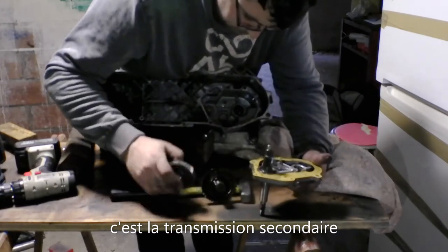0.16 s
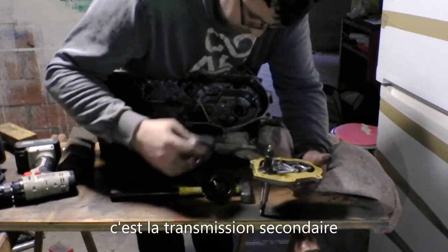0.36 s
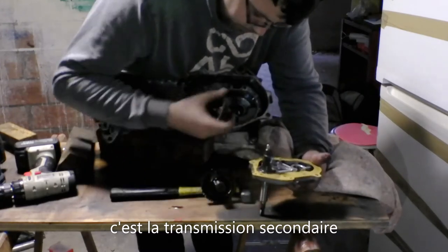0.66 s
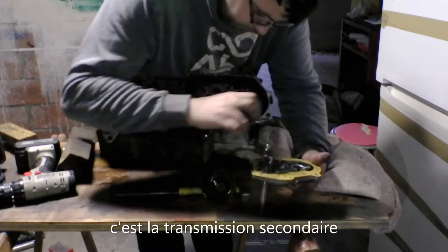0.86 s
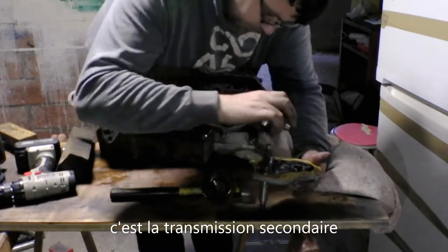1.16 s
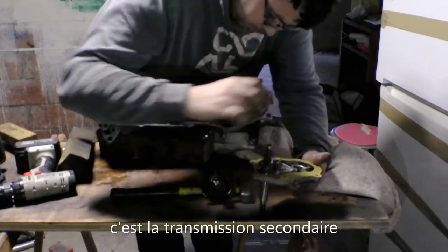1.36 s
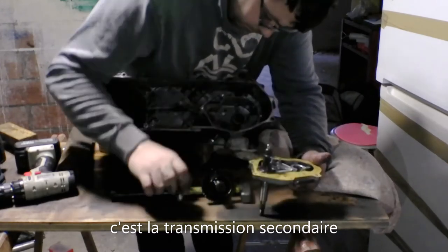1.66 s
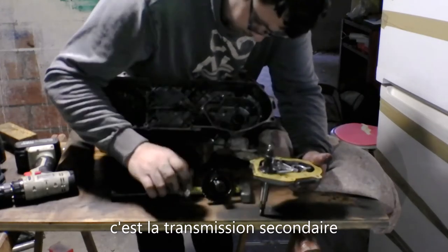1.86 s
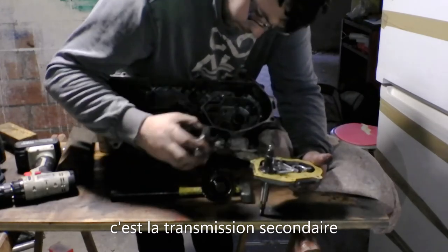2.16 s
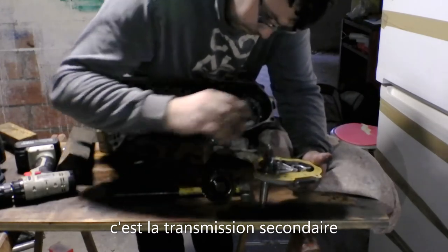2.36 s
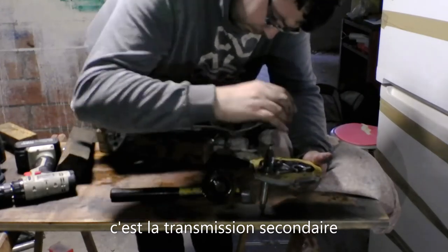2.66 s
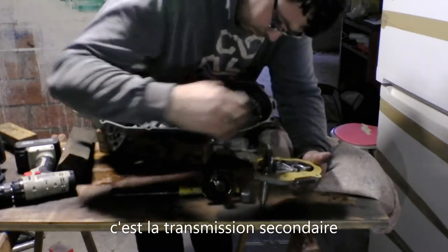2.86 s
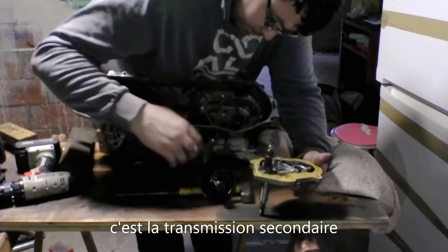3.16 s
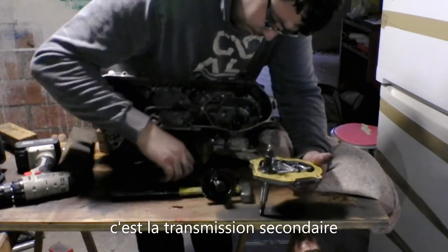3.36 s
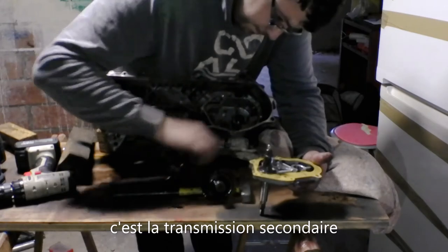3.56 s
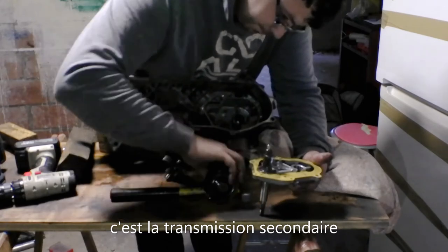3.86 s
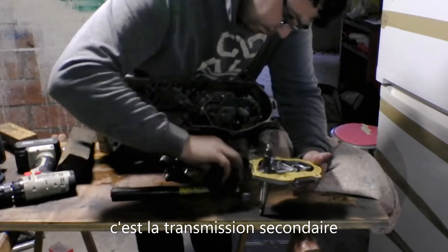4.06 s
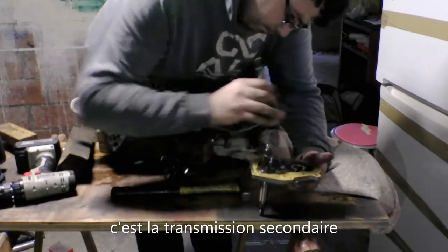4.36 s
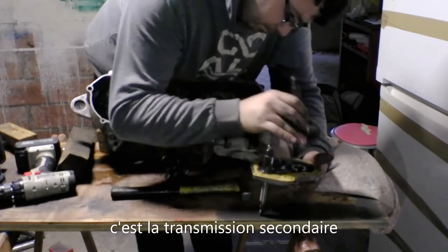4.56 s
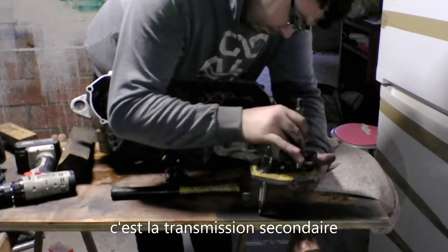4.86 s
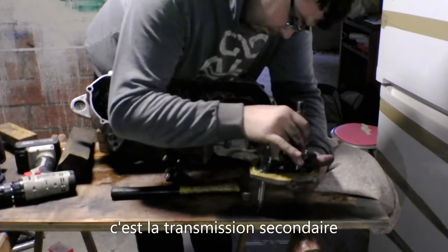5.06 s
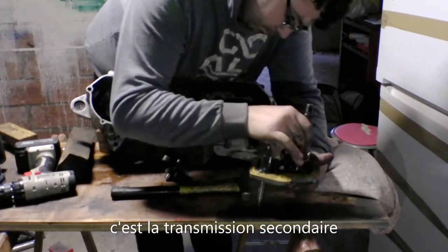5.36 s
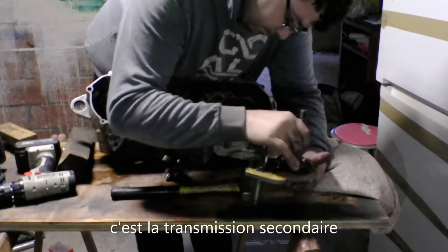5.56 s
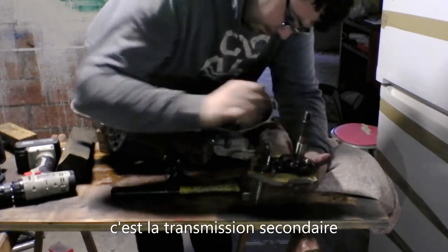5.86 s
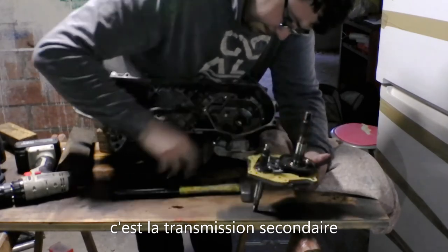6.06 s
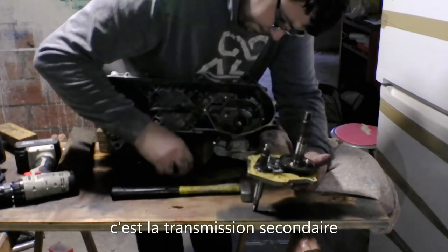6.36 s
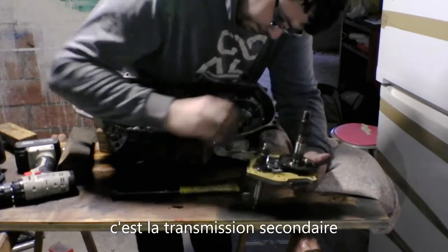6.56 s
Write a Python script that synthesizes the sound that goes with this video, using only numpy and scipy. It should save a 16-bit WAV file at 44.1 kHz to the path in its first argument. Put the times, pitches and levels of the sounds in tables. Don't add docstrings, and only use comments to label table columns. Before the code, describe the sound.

Steady microphone hiss in a small workshop. After a quiet start, a heap of steel gears drops on a wooden bench in one dense, loud clatter. A long pause, then a plank knock and a booming set-down. A very sharp steel crack with a high ring follows, then a shaft clacks, its splines tick, it slides and seats with a firm knock. Faint dragging and a soft washer scrape end it.

```python
import sys
import numpy as np
from scipy import signal
from scipy.fft import rfft, irfft
from scipy.io import wavfile
from scipy.ndimage import uniform_filter1d

SR = 44100
rng = np.random.default_rng(int(sys.argv[2]) if len(sys.argv) > 2 else 0)


def voltage_ratio(level):
    return 10 ** (np.asarray(level, float) / 20)


def master(y):
    cut = np.clip(np.atleast_2d(y).T, -1, 1)
    pcm = np.round(cut * 32767)
    wavfile.write(sys.argv[1], SR, pcm.astype(np.int16))


N = 295911


def seconds(length):
    return np.arange(int(length * SR)) / SR


def octaves(hz):
    return np.log2(np.clip(hz, 150, 9000) / 1000)


def unit(x):
    return x / np.sqrt(np.mean(x ** 2))


def fade(t, t60):
    return np.exp(-np.log(1000) * t / np.maximum(t60, 1e-3))


def add(track, start_s, x):
    i = int(start_s * SR)
    track[i:i + len(x)] += x[:N - i]


def curve(rows, hz):
    f, value = np.transpose(rows)
    return np.interp(np.log(np.maximum(hz, 1)), np.log(f), value)


def colour(x, rows, tilt_db=0.):
    size = 1024
    hz = np.fft.rfftfreq(2 * size, 1 / SR)
    db = curve(rows, hz) + tilt_db * octaves(hz)
    cepstrum = irfft(db * np.log(10) / 20)
    cepstrum[1:size] *= 2
    cepstrum[size + 1:] = 0
    response = irfft(np.exp(rfft(cepstrum)))[:size]
    return signal.fftconvolve(x, response)[:len(x)]


def resonate(x, peaks):
    return sum(voltage_ratio(db) * signal.lfilter(*signal.iirpeak(f, f / max(width, 10), SR), x)
               for f, width, db in peaks)


def blows(cracks, rings, rows, modes, crack, first=4.6):
    t = seconds(.26)
    hz, mode_db, t60 = np.array(modes, float).T[:, :, None]
    for start_s, peak_db, tilt_db, ring_db, crack_t60 in rows:
        grit = rng.standard_normal(len(t)) * fade(t, crack_t60)
        grit[0] = first
        snap = colour(grit, crack, tilt_db)
        gain = voltage_ratio(mode_db + 0.5 * rng.standard_normal(hz.shape) + tilt_db * octaves(hz))
        ring = (gain * np.sin(2 * np.pi * hz * t) * fade(t, t60)).sum(axis=0)
        ring *= 1 - np.exp(-t / 0.00081)
        add(cracks, start_s, voltage_ratio(peak_db) * snap / abs(snap).max())
        add(rings, start_s, voltage_ratio(peak_db + ring_db) * ring / gain.max())


# f/Hz, level/dB, t60/s
HEAP_MODES = [(210, -6, 0.058), (400, -11, 0.04), (445, 0, 0.049), (543, 1, 0.066), (820.5, -2.5, 0.06),
              (941, -9, 0.084), (1065, -1.5, 0.078), (1296, -9.5, 0.095), (1575, -17, 0.043),
              (1975, -13, .04), (2810, -17, 0.056), (3004, -14, 0.023)]
COG_MODES = [(2160, -5.5, .07), (2600, 1, 0.12), (2820, -1, 0.064), (5314, -0.5, 0.071), (5700, -2, 0.077),
             (6845, -4.5, 0.073), (7294, -1.5, 0.076), (8700, -18, .06)]
# f/Hz, level/dB
HEAP_COLOUR = [(47, -19), (90, -3.5), (200, -12.5), (500, -5), (1050, -5), (1900, -13), (2900, -21),
               (6100, -22.5), (8200, -39), (12000, -46.5), (22000, -120)]
# t/s, peak/dB, brightness/(dB per octave), ring/dB, crack t60/s
HEAP_HITS = [(1.386, -22.5, -10, -6.5, 0.037), (1.39, -19, -8.5, -3.5, 0.06),
             (1.396, -19.5, -5.5, -8.5, .04), (1.399, -16.5, 1.5, -11, 0.22),
             (1.4042, -24, -1.5, -8, 0.039), (1.4159, -5.5, -1.5, 1.5, 0.032), (1.422, -8.5, 2, -8, 0.021),
             (1.426, -2, 1, -11.5, 0.0087), (1.4303, -3, 4, -8, 0.05), (1.434, -4.5, 1.5, -19, 0.018),
             (1.437, -11.5, -3, -7.5, 0.014), (1.444, -18, 1, 0, 0.062), (1.451, -14, 0.5, -7, 0.15),
             (1.457, -15.5, -2, -7.5, 0.062), (1.466, -19.5, -1.5, -9, 0.053), (1.477, -31, 4, -7, 0.035),
             (1.488, -33.5, -3.5, -8, 0.053), (1.505, -46, 0, -14, 0.043), (1.539, -28, 2.5, -14, 0.093),
             (1.516, -41, 8, -10, 0.018), (1.547, -37, -4, -10, .02), (1.558, -38, -2, -18, 0.03),
             (1.575, -42, 0, -13, 0.035), (1.597, -46, -4, -17, 0.033)]
COG_HITS = [
    (1.388, -26.5, 7, -9.5, .03),
    (1.4328, -17, -3, -3.5, .015),
    (1.476, -35, 6, -13, .03),
    (1.534, -35, -10, -2, .04),
]


def heap_drop(cracks, rings):
    blows(cracks, rings, HEAP_HITS, HEAP_MODES, HEAP_COLOUR)
    blows(cracks, rings, COG_HITS, COG_MODES, HEAP_COLOUR)


# f/Hz, level/dB, t60/s
PLANK_MODES = [(191, 3.5, 0.084), (229.6, 1, .07), (321, -6, 0.2), (470, -2, 0.089), (563, -5, 0.061),
               (699, -21.5, 0.13), (1030, -15, 0.1), (1154, -6, 0.034), (1330, -34, .07),
               (1800, -23, 0.093), (2550, -19, .06), (4231, -18, 0.023)]
# f/Hz, level/dB
KNOCK_COLOUR = [(47, -14), (80, -9.5), (544, -10), (1490, -22), (1780, -14.5), (2040, -32), (2700, -23),
                (3300, -42.5), (4400, -34.5), (9000, -77), (11700, -95), (19800, -120)]
# t/s, peak/dB, brightness/(dB per octave), ring/dB, crack t60/s
KNOCK_HITS = [
    (3.328, -19, 0.049, -2, 0.083),
    (3.3321, -24, -0.25, 1.4, 0.0066),
    (3.36, -36, 0, 1.8, .02),
]


def plank_knock(cracks, rings):
    blows(cracks, rings, KNOCK_HITS, PLANK_MODES, KNOCK_COLOUR)


# f/Hz, level/dB, t60/s
BENCH_MODES = [(186, -7.5, 0.12), (239.5, -6, 0.059), (417, -35, .07), (476.7, 3.5, 0.11), (514, -9, 0.17),
               (633, -11, 0.1), (717, -14.5, 0.094), (1040, -8.5, 0.12), (1470, -1.5, 0.033),
               (1836, -24, .07), (2690, -10, 0.028)]
# f/Hz, level/dB
BENCH_COLOUR = [(47, -24.5), (80, -11), (517, -12.5), (873, -16.5), (2150, -17.5), (2710, -11.5),
                (3010, -16), (6270, -28), (7890, -40), (9530, -64), (12000, -48), (15600, -83),
                (22000, -120)]
# t/s, peak/dB, brightness/(dB per octave), ring/dB, crack t60/s
BENCH_HITS = [
    (3.4955, -10, -1.3, -5.5, 0.058),
    (3.4999, -11.5, 0.4, -9, 0.029),
    (3.514, -19.5, -3.5, 6, 0.034),
    (3.523, -29, -2.5, 6.5, .02),
    (3.953, -41, -9.5, -21, 0.029),
]


def bench_set_down(cracks, rings):
    blows(cracks, rings, BENCH_HITS, BENCH_MODES, BENCH_COLOUR)


# f/Hz, level/dB, t60/s
GEAR_MODES = [(2993, -.5, .18), (3004, -33, .5), (4226, -32, .08), (6029, -14, .1), (6380, -33, .1),
              (6691, -8.5, .12), (7359, -15, .16), (11500, -30, .12)]
# f/Hz, level/dB
GEAR_COLOUR = [(47, -62), (80, -26), (1780, -1), (2390, -2.5), (4120, 1.5), (5410, -11.5), (6960, -14.5),
               (7890, -12.5), (8760, -36.5), (12000, -27), (15600, -83), (22000, -120)]
# t/s, peak/dB, brightness/(dB per octave), ring/dB, crack t60/s
GEAR_HITS = [
    (4.013, -0.28, 0.28, -11, 0.0068),
]


def gear_crack(cracks, rings):
    blows(cracks, rings, GEAR_HITS, GEAR_MODES, GEAR_COLOUR, first=11.4)


# f/Hz, level/dB, t60/s
CLATTER_MODES = [(225.5, -8.5, 0.067), (475, -6.5, 0.11), (800, -21, 0.056), (1070, 1, 0.029),
                 (1550, -13, 0.028)]
# f/Hz, level/dB
CLATTER_COLOUR = [(60, -46), (150, -7.5), (450, 3.5), (1100, 7.5), (2200, -1), (4200, -20), (5500, -30),
                  (8000, -42), (12000, -45)]
# t/s, peak/dB, brightness/(dB per octave), ring/dB, crack t60/s
CLATTER_HITS = [
    (4.0157, -16, -0.5, -14, 0.12),
    (4.038, -20, -5, -6, 0.054),
    (4.046, -35, 3, -9, 0.02),
    (4.055, -23.5, -2, 1.5, 0.018),
    (4.063, -26, -5, -14, 0.016),
    (4.081, -49, 1, 14, 0.025),
]


def gear_clatter(cracks, rings):
    blows(cracks, rings, CLATTER_HITS, CLATTER_MODES, CLATTER_COLOUR)


# f/Hz, level/dB, t60/s
SHAFT_MODES = [(440, -5, .04), (700, -6, 0.075), (1102, 1, 0.055), (1190, 2, 0.04), (1570, -10, 0.031),
               (1824, -6, 0.043), (2139, -10, 0.06), (3100, -18.5, .09), (3341, -11, .05), (3612, 1, 0.075),
               (3670, -26.5, 0.46), (3800, -6.5, 0.07), (4180, -22.5, .12), (5860, -22.5, 0.09)]
# f/Hz, level/dB
SHAFT_COLOUR = [(47, -64.5), (120, -22), (280, -30), (873, -7.5), (1120, 1), (2650, -15.5), (3710, -3.5),
                (4970, -29), (7570, -26.5), (9140, -62.5), (12000, -51), (15600, -88), (22000, -120)]
# t/s, peak/dB, brightness/(dB per octave), ring/dB, crack t60/s
SHAFT_HITS = [
    (4.7164, -4.5, 0.98, -6.5, 0.045),
    (4.7215, -19, 0.21, -4.5, .015),
    (4.728, -16, 0.5, -14.5, 0.014),
    (4.734, -28, 1, -10, 0.026),
]


def shaft_landing(cracks, rings):
    blows(cracks, rings, SHAFT_HITS, SHAFT_MODES, SHAFT_COLOUR)


# f/Hz, level/dB, t60/s
SPLINE_MODES = [(1176, -0.5, 0.032), (1943, -20, 0.096), (2110, -10, 0.091), (2504, 1.5, 0.059),
                (2910, -3.5, 0.065), (3660, 4.5, 0.033), (3780, -13, 0.057), (4050, -6, 0.097),
                (4090, -6, .09), (6130, -23, 0.074), (6500, -18, 0.035), (4920, -24, .08)]
# f/Hz, level/dB
SPLINE_COLOUR = [(47, -79), (80, -71), (1150, -14.5), (1670, -18), (2060, -8.5), (3340, -15.5),
                 (3630, -10.5), (5190, -28), (7890, -28.5), (10600, -54.5), (12000, -33), (15600, -54.5),
                 (22000, -120)]
# t/s, peak/dB, brightness/(dB per octave), ring/dB, crack t60/s
SPLINE_HITS = [
    (4.8448, -18.5, -5, -9, 0.051),
    (4.855, -25, -10.5, -14, .015),
    (4.874, -27, -4, -9, 0.007),
    (4.8856, -8.5, 0.5, -12, 0.005),
    (4.889, -20, 0.5, 4, 0.03),
    (4.893, -14, 0, -13, 0.024),
    (4.902, -25.5, -4.5, -11, 0.03),
    (4.911, -35, 1.5, -10, .1),
]


def spline_catch(cracks, rings):
    blows(cracks, rings, SPLINE_HITS, SPLINE_MODES, SPLINE_COLOUR)


# f/Hz, level/dB, t60/s
SEAT_MODES = [(352, -15.5, 0.14), (1204, 12.5, 0.033), (2034, -2.5, 0.038), (2074, -5.5, 0.063),
              (2420, -11, 0.028), (2772, -20, 0.064), (3520, -5, 0.043), (3690, -4, 0.025),
              (3800, -3, 0.031), (4140, -5, 0.037), (4580, -4.5, 0.022), (6140, -27, 0.035),
              (6700, -10, 0.0205)]
# f/Hz, level/dB
SEAT_COLOUR = [(47, -68), (80, -17.5), (560, -25), (860, -16.5), (1200, -4.5), (1710, -19.5), (2020, -13.5),
               (3070, -24.5), (3710, -18.5), (5080, -36.5), (6530, -29.5), (8300, -45.5), (12000, -50),
               (15600, -89), (22000, -120)]
# t/s, peak/dB, brightness/(dB per octave), ring/dB, crack t60/s
SEAT_HITS = [
    (5.359, -26, -1.6, 1, 0.022),
    (5.370, -31.5, -.3, -9, .012),
    (5.479, -5.5, 1.06, 0.5, 0.031),
    (5.488, -17, -1.8, -25.5, 0.035),
    (5.497, -25, 2, -18, 0.052),
    (5.51, -32, 1.5, -17, 0.061),
    (5.522, -34, 0.56, -18, 0.052),
    (5.554, -42, -1, -1, 0.027),
]


def shaft_seat(cracks, rings):
    blows(cracks, rings, SEAT_HITS, SEAT_MODES, SEAT_COLOUR)


# f/Hz, width/Hz, level/dB
STEEL_BANDS = [(1150, 490, -3.5), (1760, 540, -5.5), (2650, 510, -1)]
GRIT_BANDS = [(3460, 1200, 0), (4370, 1000, -5), (5850, 1300, -2.5), (7830, 10000, 2)]
# t/s, peak level/dB, f/Hz, t60/s
TOUCH_NOTES = [(1.391, -15, 262, 0.027), (1.43, -11, 2976, 0.03), (1.452, -10, 1070, 0.047),
               (1.476, -23.5, 1880, 0.044), (3.547, -36, 1820, 0.034), (4.036, -21.5, 1070, 0.017),
               (4.046, -22, 506, 0.02), (4.054, -16.5, 1133, 0.036), (4.063, -20, 506, 0.024),
               (3.664, -50, 1220, 0.029), (3.692, -45.5, 1190, 0.043), (3.701, -48, 2310, 0.051),
               (4.045, -24.5, 6691, 0.17), (5.098, -49.5, 2490, 0.091), (3.928, -55, 6630, .12),
               (3.954, -51, 6720, .2), (3.954, -58, 6200, .25), (4.7174, -30, 7410, .17),
               (4.855, -27, 2130, 0.032), (1.476, -30, 10200, .08), (5.48, -18.5, 1250, .03),
               (5.126, -41.5, 2580, 0.029), (5.277, -41, 2280, 0.0099), (5.314, -43, 1030, 0.043),
               (5.343, -33, 2640, 0.055), (5.345, -36, 3650, 0.075), (5.411, -44, 1150, 0.033),
               (5.429, -36, 2750, 0.035), (6.089, -43.5, 2700, 0.041), (6.089, -39.5, 3650, 0.021),
               (6.193, -49, 4400, 0.065), (6.286, -52, 3580, 0.018)]


def touches(track):
    t = seconds(.12)
    for start_s, peak_db, hz, t60 in TOUCH_NOTES:
        grit = unit(resonate(rng.standard_normal(len(t)), STEEL_BANDS + GRIT_BANDS)) * fade(t, 0.78 * t60)
        note = np.sin(2 * np.pi * hz * t) * fade(t, t60)
        add(track, start_s, voltage_ratio(peak_db - 2) * (note + 0.11 * grit))


def slips(rate_hz, spread_db):
    clicks = rng.random(N) < rate_hz / SR
    return clicks * rng.standard_normal(N) * voltage_ratio(spread_db * rng.exponential(size=N))


def swells(rows):
    t, gain = np.arange(N) / SR, np.zeros(N)
    for peak_s, rise, fall, db in rows:
        span = slice(int((peak_s - rise) * SR), int((peak_s + fall) * SR))
        late = t[span] - peak_s
        drop_db = 30 * np.where(late < 0, -late / rise, late / fall)
        gain[span] += voltage_ratio(db - drop_db)
    return uniform_filter1d(gain, size=200)


# f/Hz, width/Hz, level/dB
WOOD_BANDS = [(199, 41, 4), (328, 100, -6), (452.8, 160, -2), (802, 130, -11)]
# t/s of the hardest push, rise/s, fall/s, steel level/dB, wood over steel/dB
DRAG_PUSHES = [(1.375, .12, 0.084, -39, -4.5), (1.392, 0.01, 0.047, -36, 6),
               (1.489, 0.076, 0.14, -35.5, -14), (1.555, .12, 0.17, -49, 5.5),
               (3.672, 0.022, 0.016, -51, -5), (3.692, 0.037, 0.18, -64, 7),
               (3.959, 0.092, 0.067, -55.5, 5), (5.122, 0.086, .025, -56, -20),
               (5.276, 0.0033, 0.017, -52, -15), (5.29, 0.049, 0.11, -53, -4),
               (5.345, 0.0054, 0.043, -42.5, -4), (5.371, 0.014, 0.07, -55.5, 14),
               (5.40, 0.045, 0.23, -61, -4), (5.469, 0.062, 0.11, -43, -22.5),
               (5.862, 0.081, 0.19, -63.5, 3), (5.94, 0.25, 0.14, -58, -9.5),
               (6.09, 0.016, 0.13, -54.5, -1), (6.188, 0.21, 0.5, -55.5, -2), (6.27, 0.066, 0.025, -70, 7)]


def dragging():
    rasp = slips(6000, 1.2)
    wood = unit(resonate(slips(2600, 0.83), WOOD_BANDS))
    steel = unit(resonate(rasp, STEEL_BANDS))
    grit = unit(resonate(resonate(rasp, GRIT_BANDS), GRIT_BANDS))
    wood_rows = [(s, rise, fall, db + wood_db) for s, rise, fall, db, wood_db in DRAG_PUSHES]
    steel_rows = [(s, rise, fall, db) for s, rise, fall, db, _ in DRAG_PUSHES]
    grit_rows = [(s, rise, 0.5 * fall, db - 4.5 + .15 * wood_db) for s, rise, fall, db, wood_db in DRAG_PUSHES]
    return wood * swells(wood_rows) + steel * swells(steel_rows) + grit * swells(grit_rows)


# f/Hz, width/Hz, level/dB
BORE_BANDS = [(1260, 60, -3), (1880, 67, -3.5), (2280, 60, 0), (2750, 53, -7), (3650, 62, 2),
              (4400, 79.7, 1), (6000, 100, -2), (7550, 66, -2.5)]
# t/s, rise/s, fall/s, level/dB
BORE_SLIDES = [
    (5.277, 0.0038, 0.033, -49.5),
    (5.43, 0.042, 0.044, -45),
    (5.465, 0.05, 0.02, -45),
]


def bore_slide():
    return unit(resonate(slips(3000, 1.3), BORE_BANDS)) * swells(BORE_SLIDES)


# t/s, rise/s, fall/s, level/dB
BENCH_HUMS = [
    (6.198, 0.26, 0.065, -49.5),
    (6.242, 0.044, 0.079, -51.5),
]


def bench_hum():
    lowest = WOOD_BANDS[:1]
    return unit(resonate(resonate(slips(350, 2.0), lowest), lowest)) * swells(BENCH_HUMS)


# f/Hz, width/Hz, level/dB
WASHER_BANDS = [(1660, 360, -5), (2180, 260, -3), (2640, 100, -6), (2950, 145, -4.5)]
# t/s, rise/s, fall/s, level/dB
WASHER_SCRAPES = [
    (6.292, 0.014, 0.11, -51.5),
    (6.326, 0.11, 0.29, -50.5),
]


def washer_scrape():
    squeal = unit(resonate(resonate(slips(2200, 1.44), WASHER_BANDS), WASHER_BANDS))
    return squeal * swells(WASHER_SCRAPES)


# f/Hz, t60/s
ROOM_DECAY = [(100, 0.45), (400, 0.27), (1500, 0.17), (4000, 0.19), (9000, 0.24)]


def room(x):
    t = seconds(.4)
    tail = 0
    for hz in 125 * 2. ** np.arange(7):
        band = resonate(rng.standard_normal(len(t)), [(hz, 0.87 * hz, 0)])
        tail = tail + band * fade(t, curve(ROOM_DECAY, hz))
    tail *= np.clip(t / 0.003, 0, 1)
    return voltage_ratio(-14) * signal.fftconvolve(x, tail / np.sqrt(np.sum(tail ** 2)))[:N]


def shake(x):
    t = seconds(.8)
    sway = resonate(rng.standard_normal(len(t)), [(55, 40, 0)]) * fade(t, .6)
    return voltage_ratio(-64) * signal.fftconvolve(abs(x), sway / np.sqrt(np.sum(sway ** 2)))[:N]


def microphone(x):
    x = signal.sosfilt(signal.butter(4, 162, "high", fs=SR, output="sos"), x)
    return signal.sosfilt(signal.butter(3, 8970, fs=SR, output="sos"), x)


# f/Hz, level/dB
HISS_COLOUR = [(12, -61), (20, -29.5), (59, -17), (97, -3.5), (123, -8), (181, -1), (320, -0.5),
               (468, -3.5), (850, -5), (1820, -9.5), (2450, -11.5), (12200, -16.5), (13200, -16)]


def hiss():
    return voltage_ratio(-56.5) * unit(colour(rng.standard_normal(N), HISS_COLOUR))


def scene():
    cracks, rings = np.zeros((2, N))
    for event in (heap_drop, plank_knock, bench_set_down, gear_crack, gear_clatter,
                  shaft_landing, spline_catch, shaft_seat):
        event(cracks, rings)
    touches(rings)
    slides = dragging() + bore_slide() + bench_hum() + washer_scrape()
    work = cracks + rings + room(cracks + 0.28 * rings) + slides
    return (microphone(work) + shake(cracks + rings) + hiss())[None]


SHORT_ALL = [5.439, 5.462]
SHORT_BASS = [.273, .678, .784, 6.695]
SHORT_MID = [.039, .357, .466, .699, .87, .998, 1.98, 2.023, 2.108, 2.257, 2.363, 2.512, 2.532, 2.748,
             2.813, 3.068, 3.174, 3.409, 3.451, 4.326, 4.391, 4.412, 5.011, 5.287, 5.799, 6.632, 6.652]
SHORT_HIGH = [1.447, 1.532, 1.638, 1.703, 1.767, 1.917, 2.192, 2.386, 2.876, 4.177, 4.668, 5.626, 6.311,
              6.394]
SHORT_TOP = [.637, 3.56, 4.797, 5.564, 5.84, 6.502]
SHORT_FROM_HZ = 120, 480, 1780, 3150, 4800
SHORT_STEP_DB = 7, 6.3, 7.5, 7.2, 7.7
# from t/s, to t/s, above f/Hz
BUSY_SPANS = [(1.40, 1.43, 12000), (1.44, 1.56, 11300), (1.57, 1.6, 12000), (3.51, 3.56, 12100),
              (4.02, 4.08, 12300), (4.73, 4.79, 12100), (4.86, 4.9, 12250), (5.41, 5.47, 11800)]
# from t/s, to t/s, above f/Hz
THIN_SPANS = [(4.0, 4.07, 8100)]


def starve(x):
    size, offset = 941, 762
    n, k = np.arange(2 * size) + .5, np.arange(size) + .5
    basis = np.sqrt(2 / size) * np.cos(np.pi / size * (n[:, None] + size / 2) * k)
    line_hz = k * SR / 2 / size

    def frame(s):
        return int(round((s * SR - offset) / size))

    def above(spans):
        return {i: hz for s0, s1, hz in spans for i in range(frame(s0), frame(s1) + 1)}

    smooth = np.sin(np.pi * n / 2 / size)
    sudden = np.sin(np.pi / 2 * np.clip((k - size / 2) * 8 / size + .5, 0, 1))
    windows = {frame(1.447): np.r_[sudden, smooth[size:]],
               frame(5.462): np.r_[smooth[:size], sudden[::-1]]}
    groups = SHORT_ALL, SHORT_BASS, SHORT_MID, SHORT_HIGH, SHORT_TOP
    steps = {}
    for times, from_hz, step_db in zip(groups, SHORT_FROM_HZ, SHORT_STEP_DB):
        for s in times:
            steps[frame(s)] = from_hz, step_db
    tops, thin = above(BUSY_SPANS), above(THIN_SPANS)
    padded = np.pad(x, 2 * size)
    y = padded.copy()
    for i in set(steps) | set(tops) | set(thin):
        span = slice(offset + size * (i + 1), offset + size * (i + 3))
        window = windows.get(i, smooth)
        lines = (padded[span] * window) @ basis
        gain = 1. * (line_hz < tops.get(i, SR))
        local = np.sqrt(uniform_filter1d(lines ** 2, size=150))
        if i in thin:
            top = (line_hz > thin[i]) & (line_hz < 12400)
            gain[top] *= abs(lines[top]) > voltage_ratio(6) * np.std(lines[top])
        if i in steps:
            hz, step_db = steps[i]
            growth = np.clip(line_hz / hz, 0, 1) ** 2.0 * voltage_ratio(0.27 * octaves(line_hz))
            step = voltage_ratio(step_db) * local * growth
            gain *= (abs(lines) > step) * np.where(line_hz > hz, voltage_ratio(4), 1)
        y[span] += window * (basis @ (lines * (gain - 1)))
    return y[2 * size:-2 * size]


def top_cut(x):
    return signal.sosfilt(signal.butter(12, 13090, fs=SR, output="sos"), x)


def record(dry):
    clipped = np.clip(dry[0], -.95, .95)
    top = signal.ellip(10, .3, 60, 12850, fs=SR, output="sos")
    mix = starve(signal.sosfilt(top, clipped))[None]
    return top_cut(mix)


dry = scene()
out = record(dry)
master(out)
```